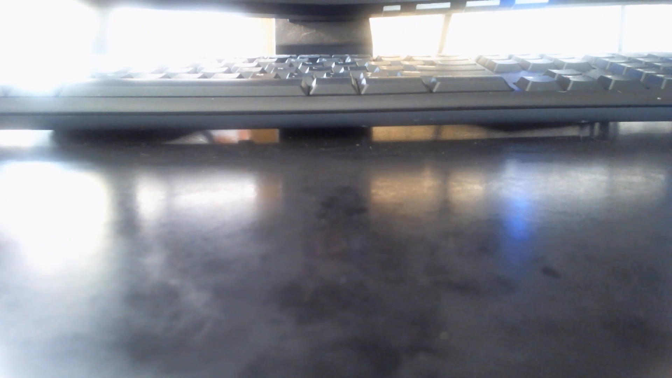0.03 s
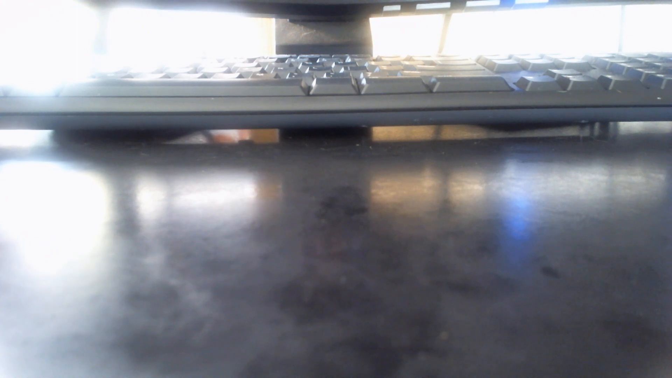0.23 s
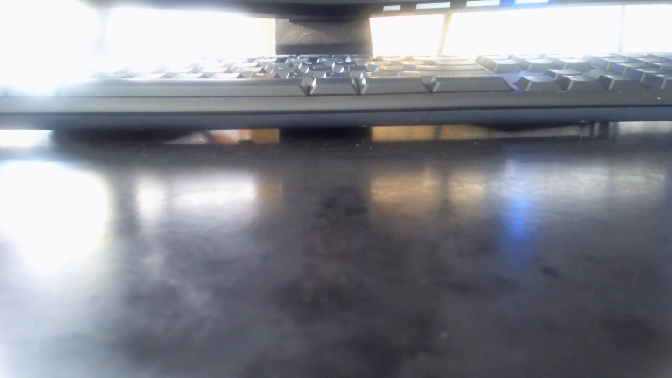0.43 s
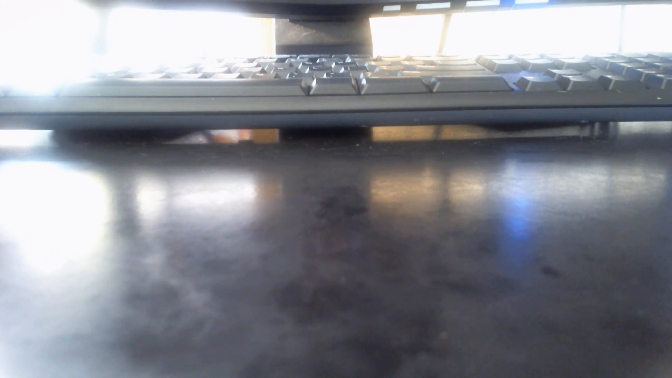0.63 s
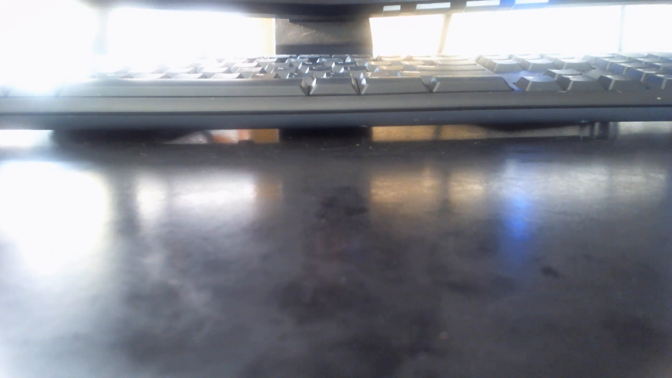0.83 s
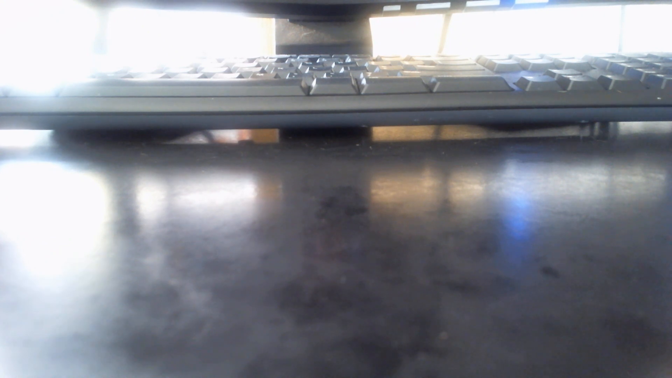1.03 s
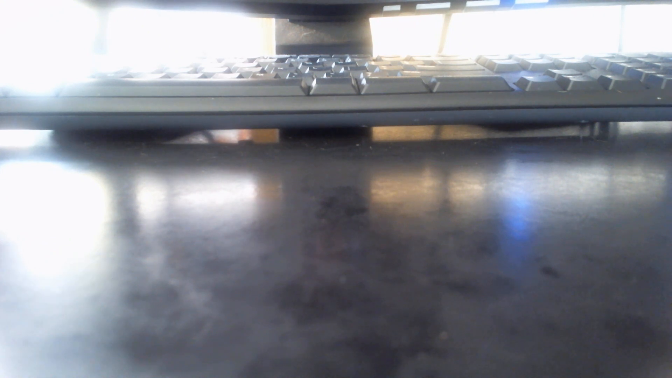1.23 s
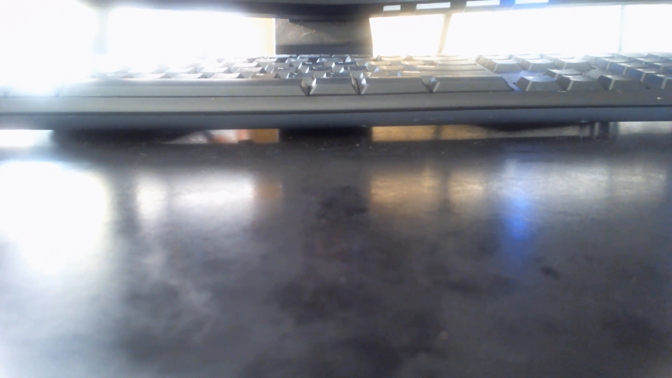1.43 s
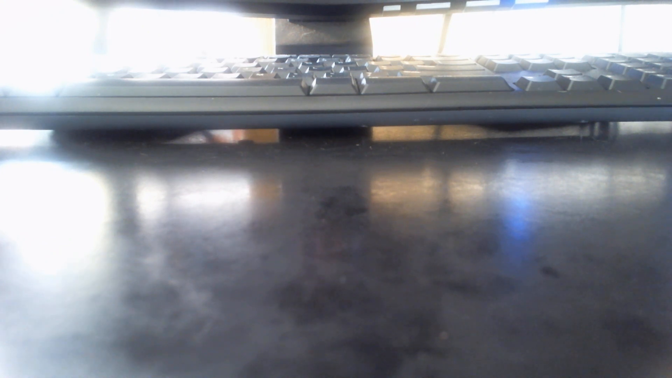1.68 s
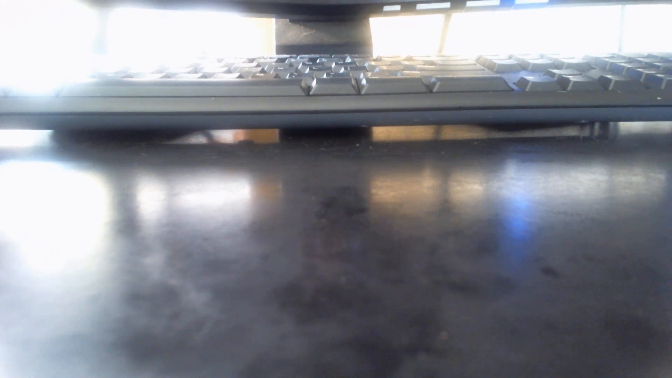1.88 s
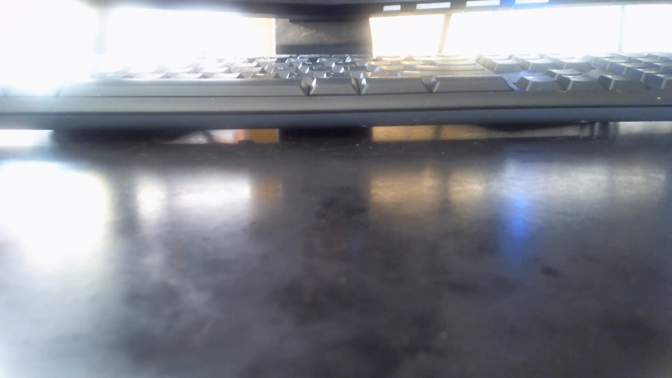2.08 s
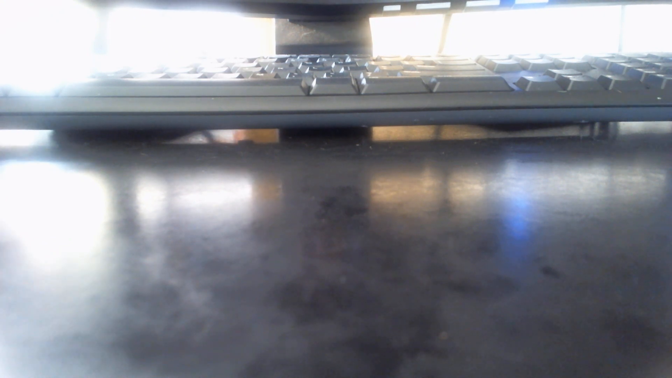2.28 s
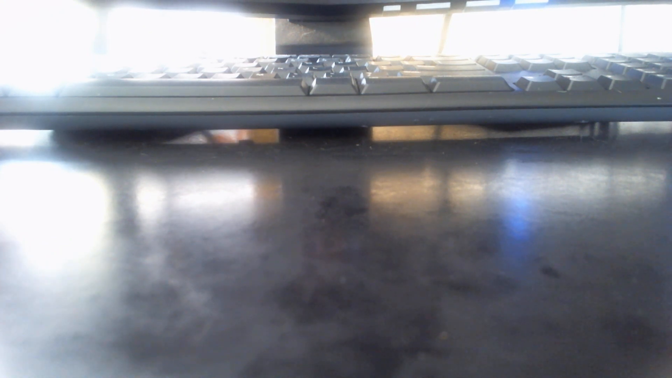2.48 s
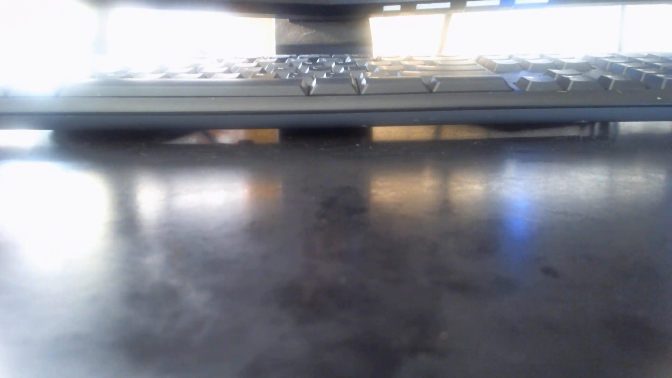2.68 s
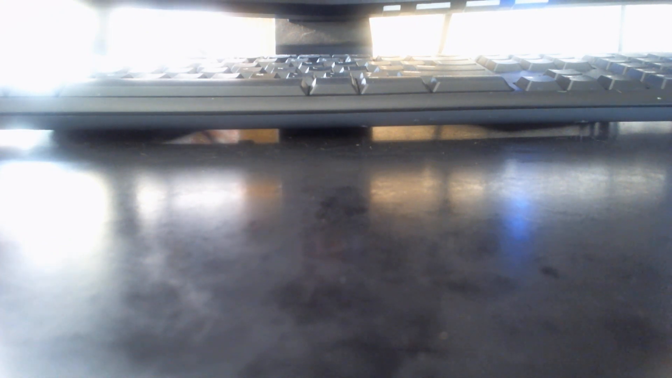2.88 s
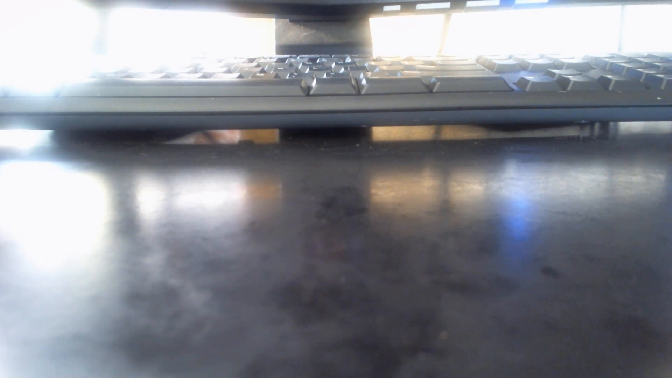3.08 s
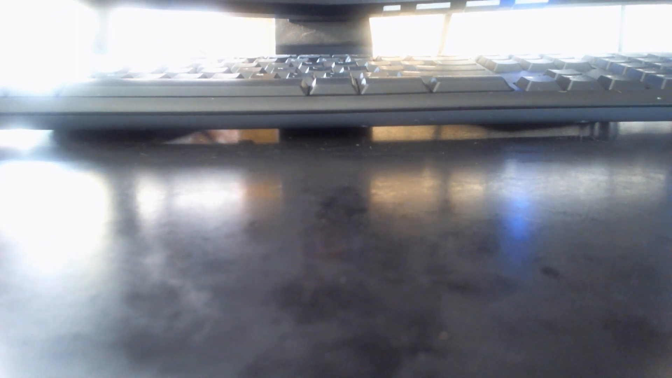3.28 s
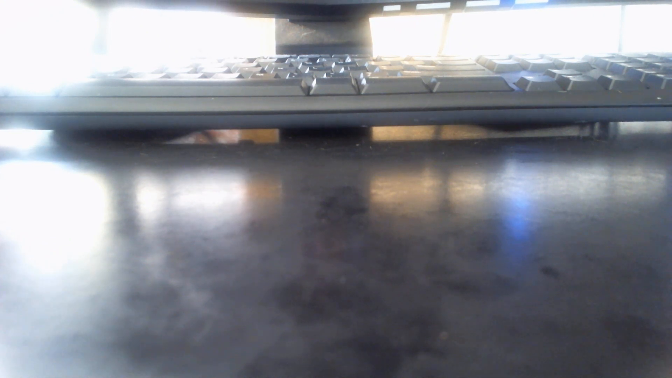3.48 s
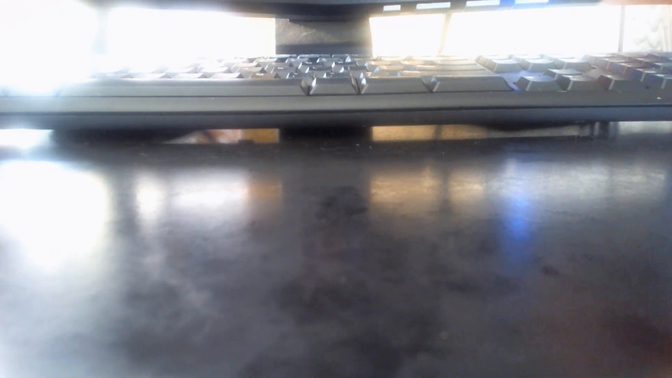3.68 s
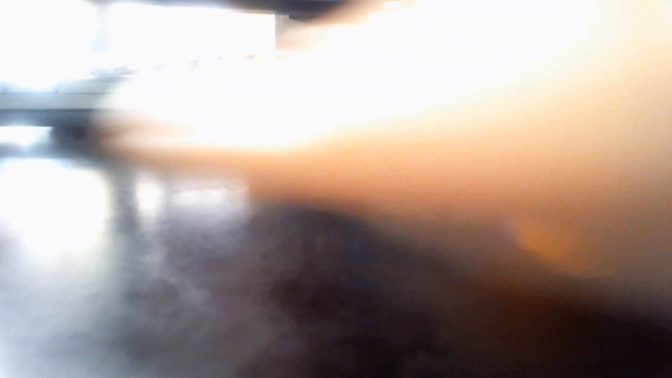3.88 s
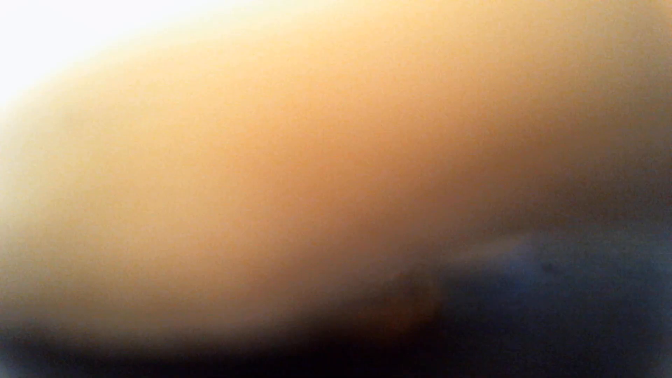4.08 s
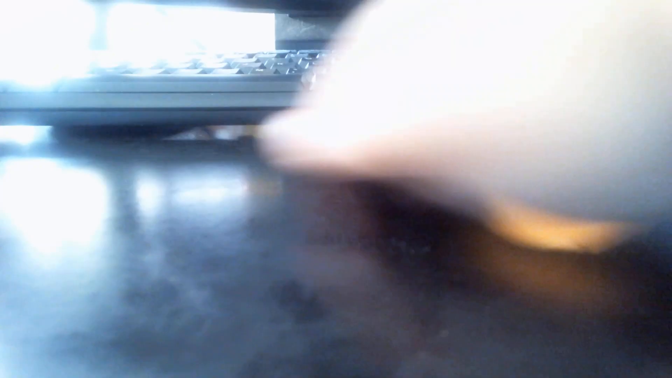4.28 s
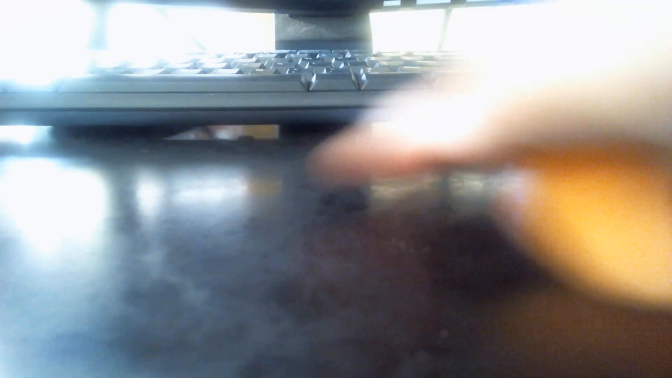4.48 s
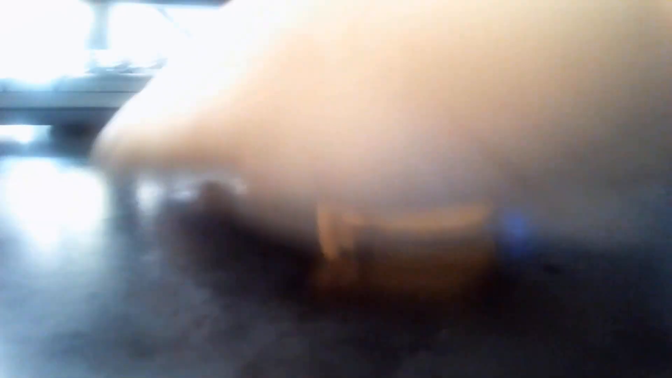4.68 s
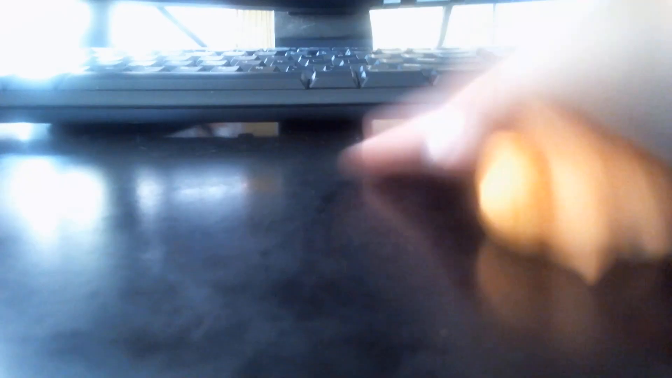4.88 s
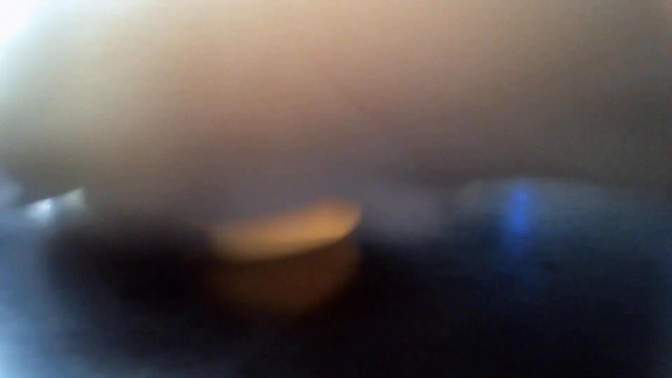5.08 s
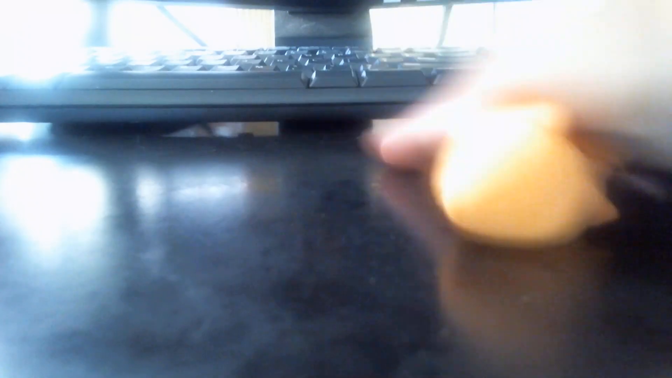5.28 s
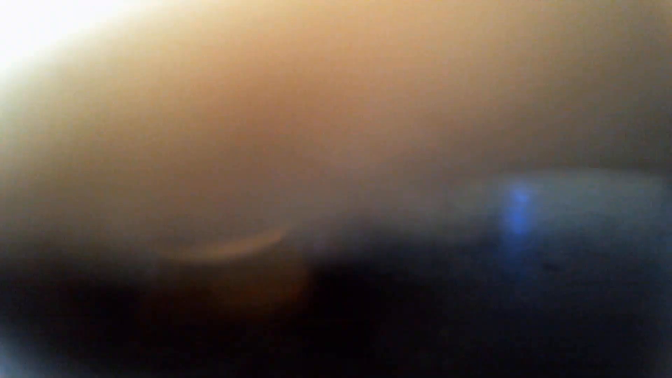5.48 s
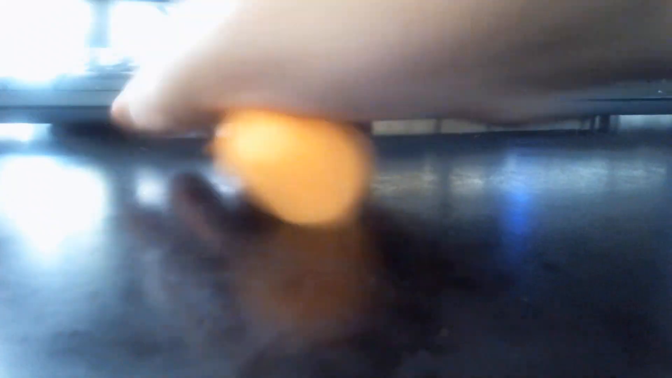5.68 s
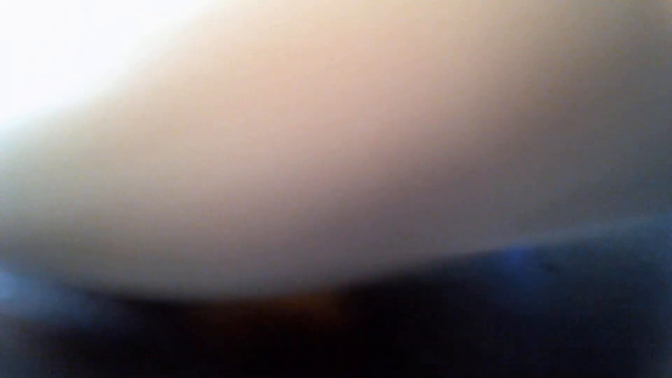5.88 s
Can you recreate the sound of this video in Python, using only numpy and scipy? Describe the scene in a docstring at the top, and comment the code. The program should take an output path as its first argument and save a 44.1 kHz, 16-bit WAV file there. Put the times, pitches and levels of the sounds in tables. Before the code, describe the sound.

Fingernails tick, tap and scuff on a hard desk as a hand slides close to the microphone, over a thin electrical whine and hiss.

```python
"""A hand scratching and tapping on a desk

A hand with a small object taps and slides over a hard desk, right by a camera lying on it.
Nails tick and scuff, skin hisses and sometimes judders, and the desk gives a few soft thumps.
Underneath are the camera's ticking focus, fluttering electrical buzz, thin whine and hiss."""
import sys
import numpy as np
from scipy import signal
from scipy.fft import rfft, irfft
from scipy.io import wavfile
from scipy.ndimage import uniform_filter1d

SR = 44100
rng = np.random.default_rng(int(sys.argv[2]) if len(sys.argv) > 2 else 0)


def to_wav(sig):
    """Store sig (one row per channel, or 1-D mono) as 16-bit WAV at the path in sys.argv[1].

    Samples outside -1..1 are clipped; the rate is SR.
    """
    pcm = np.clip(np.atleast_2d(sig), -1, 1) * 32767
    pcm = np.round(pcm).astype(np.int16)
    wavfile.write(sys.argv[1], SR, pcm.T)  # frames by channels


N = 261072
TIME = np.arange(N) / SR
# The brightest part of a touch on the desk. Each row: frequency in Hz, gain in dB.
BRIGHT_EDGE = [(5500, -16.5), (7600, 0.5), (9000, 0), (10500, -8.5), (12500, -19.5), (14000, -31),
               (16000, -36)]


def taps(level_db=18, chatter=0.24, thud_db=-17, thud_hz=650, thud_width_hz=600):
    """Each nail tick is one snap, a few milliseconds of chatter and a small thud in the desk top."""
    # Each row: start in seconds, relative level in dB, chatter fade in seconds, ring in Hz,
    # share of body in dB, share of bright edge in dB.
    ticks = [(1.0787, -33.5, 0.0016, 4400, -5, -26), (1.9162, -19, 0.00088, 3550, -3, -29),
             (1.9394, -21.5, 0.0014, 4160, -5, -26), (2.6313, -30, .004, 7100, -14, -14),
             (2.6699, -27, 0.0011, 4300, -24, -20), (2.8442, -21, 0.0021, 4700, -8.5, -15),
             (2.8952, -21, 0.0028, 6300, -12.5, -16.5), (2.9948, -26, 0.003, 5330, -1, -17),
             (3.1588, -28, 0.0014, 4370, -28, -16), (3.174, -33, 0.0013, 4130, -23, -27),
             (3.192, -27.5, .003, 5700, -13, -10), (3.656, -3, 0.00067, 5340, -10, -20),
             (3.6592, -18, 0.0016, 3100, 5, -14), (3.7175, -21, 0.0022, 5560, -7, -17),
             (3.8267, -29, .0008, 4500, -16, -24), (3.886, -24, 0.00073, 6000, -27, -3),
             (3.8928, -25, 0.0007, 4740, -14, -16), (4.372, -28.5, .001, 4720, -14, -9),
             (4.6057, -24.5, 0.002, 3270, -7, -28), (4.6287, -24, 0.0014, 5600, -9, -27),
             (4.6662, -26, 0.0013, 3370, -7, -21), (4.857, -31.5, 0.0013, 3670, 0, -6),
             (4.8714, -22.5, .0005, 5940, -6, 2), (4.9177, -18, 0.0013, 4840, -25, -9),
             (4.9563, -22.5, .0008, 5040, -2, -20), (5.0434, -24, 0.0035, 2300, -2, -12),
             (5.0497, -25, 0.00077, 2300, -3, -8), (5.068, -21.5, .0008, 6260, -33, -13),
             (5.0713, -21, 0.0032, 3480, -29, -11), (5.2906, -26.5, 0.0014, 2500, -10, -23),
             (5.3098, -29, .001, 4570, -9, -11), (5.346, -29.5, .0005, 5600, -34, -9),
             (5.4216, -18.5, 0.0023, 5440, -6, -13), (5.435, -13.5, 0.0011, 5860, -35, -18),
             (5.4586, -21.5, 0.002, 2450, 2, -26), (5.5418, -27.5, 0.004, 2980, -4, -17)]
    out, t = np.zeros(N), np.arange(SR // 100) / SR
    for start, db, chatter_s, ring_hz, body_db, edge_db in ticks + nail_catches():
        rattle = rng.standard_normal(len(t)) * np.exp(-t / chatter_s)
        blow = (t == 0) + chatter * rattle
        tick = signal.fftconvolve(blow, contact(ring_hz, body_db, edge_db, width_hz=1100, peak_db=9.5))
        thud = resonate(resonate(blow, thud_hz, thud_width_hz), thud_hz, thud_width_hz)
        add(out, start, amp(db + level_db) * tick / np.linalg.norm(tick))
        add(out, start, amp(db + level_db + thud_db + body_db / 2) * thud / np.linalg.norm(thud))
    return out


def nail_catches(per_s=6, over_skin_db=7, spread_db=1.8, chatter_s=0.0011, body_db=-9, edge_db=-14):
    """Nails catch at random as the hand slides, harder in a firm stroke. Gives more rows for taps()."""
    skin_db = 20 * np.log10(strokes()[0] + 1e-9)
    caught = np.flatnonzero(rng.random(N) < per_s / SR)
    db = skin_db + over_skin_db + spread_db * rng.standard_normal(N)
    ring_hz = rng.uniform(3000, 6000, N)
    return [(i / SR, db[i], chatter_s, ring_hz[i], body_db, edge_db) for i in caught]


def contact(ring_hz, body_db, edge_db, width_hz, peak_db):
    """How nail and desk answer one tiny slip: a low body, a high ring and a bright edge."""
    # The colours of body and ring. Each row: frequency in Hz, gain in dB.
    body_colour = [(60, 3), (300, -5), (700, -19), (1200, 5), (2100, 7), (2700, 5.5), (5000, -25.5)]
    ring_colour = [(1500, -77), (2500, -6.5), (4000, -3), (5900, -1.5), (6800, -6.5), (7800, -12.5),
                   (10000, -52)]
    hz = np.fft.rfftfreq(1024, 1 / SR)
    peak = 1 + amp(peak_db) / (1 + ((hz - ring_hz) / (width_hz / 2)) ** 2)
    ring = unit_level(gain_at(ring_colour, hz) * peak)
    body = amp(body_db) * unit_level(gain_at(body_colour, hz))
    edge = amp(edge_db) * unit_level(gain_at(BRIGHT_EDGE, hz))
    power = ring ** 2 + body ** 2 + edge ** 2
    # Turn this colour into a click that starts at once and then dies away.
    log_gain = np.log(np.r_[power, power[-2:0:-1]]) / 2
    click = np.fft.ifft(np.exp(np.conj(signal.hilbert(log_gain)))).real[:len(hz)]
    return click / np.linalg.norm(click)


def scuffs(level_db=-1.5, rise_share=0.48, fade=0.52, release_s=0.0063):
    """Each short scrape is a dense burst of slips that swells quickly and eases off."""
    # Each row: start in seconds, length in seconds, relative level in dB, ring in Hz,
    # share of body in dB, share of bright edge in dB.
    scrapes = [(1.252, .005, -41, 5100, -9, -24), (1.288, 0.026, -49, 2400, 3, -20),
               (1.904, 0.0098, -24.5, 3470, -10.5, -19), (1.913, 0.034, -32, 3550, -8, -16),
               (2.677, 0.028, -34.5, 5900, -9, -15), (2.779, 0.0046, -34, 3660, -14, -20),
               (2.992, .006, -39, 5270, -14, -13), (2.892, .01, -37, 5690, 1, -9),
               (3.109, 0.019, -37.5, 4600, -6.5, -22), (3.594, .04, -40, 3630, -6, -3),
               (3.654, 0.036, -28, 5050, -8, -33), (3.683, 0.033, -33.5, 3370, -15, -29),
               (3.792, 0.0058, -28, 5900, -24, -24), (3.805, 0.006, -24.5, 5860, -18, -12),
               (3.858, 0.022, -28, 6000, -27, -15), (3.905, 0.0092, -30, 5170, -28, -14),
               (3.982, 0.015, -34, 3160, -13, -18), (4.25, 0.024, -38, 3700, -6, -14),
               (4.343, 0.072, -43.5, 4870, -5, 1), (4.539, 0.0084, -33.5, 3300, -9, -17),
               (4.638, .025, -34, 3560, -6, -22), (4.683, 0.014, -32, 3070, -29, -8),
               (4.746, 0.0094, -34, 7080, -11, -6.5), (4.88, 0.073, -29, 5840, -15, -6),
               (4.98, 0.034, -40.5, 2730, 4, -21), (5.4312, 0.0042, -28.5, 5540, -0.5, 3),
               (5.73, 0.031, -36, 3000, -7, -12), (5.78, 0.02, -29, 5000, -12, -19)]
    out, t = np.zeros(N), np.arange(SR // 12) / SR
    slips = grit(per_s=3400, spread_db=3.0, smooth=0.51)
    for start, length, db, *colour in scrapes:
        rise = np.minimum(t / (rise_share * length), 1)
        fall = np.exp(-fade * t / length - np.maximum(t - length, 0) / release_s)
        friction = rise * fall * np.roll(slips, -round(start * SR))[:len(t)]
        scrape = signal.fftconvolve(friction, contact(*colour, width_hz=580, peak_db=10))
        add(out, start, amp(db + level_db) * np.sqrt(length * SR) * scrape / np.linalg.norm(scrape))
    return out


def slide(skin_db=-0.5, palm_db=1, fizz_db=-3.5, uneven_db=1.46, echo=0.56, echo_s=0.000418, sway=0.25):
    """Skin drags over the desk's fine grain under an unsteady pressure."""
    # The colours of skin hiss and palm rustle. Each row: frequency in Hz, gain in dB.
    skin_colour = [(1000, -41), (1600, -1.5), (1950, 4.5), (2300, -2), (2750, 0.5), (3400, 4.5), (4600, 7),
                   (5800, 4), (6600, -1.5), (7400, -7), (9000, -28)]
    palm_colour = [(40, 11.5), (120, -3.5), (280, -3), (600, 0), (1200, 3), (1600, -2), (2600, -71)]
    skin, palm, fizz = strokes()
    pressure = amp(uneven_db * coloured_noise([(5, -5), (25, 7), (70, -24), (200, -36), (600, -67)]))
    slips = pressure * grit(per_s=2200, spread_db=5.5, smooth=1.18)
    # The cupped palm reflects the sound; its changing height shifts the hollow colour.
    wander = coloured_noise([(1, 0), (5, 0), (10, -30), (30, -120)])
    delay_s = echo_s * np.exp(sway * wander)
    slips = slips + echo * np.interp(TIME - delay_s, TIME, slips)
    return (amp(skin_db) * skin * coloured(slips, skin_colour)
            + amp(palm_db) * palm * coloured(slips, palm_colour)
            + amp(fizz_db) * fizz * coloured(slips, BRIGHT_EDGE))


def strokes(attack_s=0.037, release_s=0.066, sag_db_per_s=6):
    """Strength of skin, palm and fizz: a stroke sets in fast, slackens and dies as the hand slows."""
    # Each row: start and length in seconds, then relative levels of skin, palm and fine fizz in dB.
    hand_moves = [(1.867, 0.034, -37.5, -50, -57), (2.073, .22, -54, -58.5, -64),
                  (2.64, 0.31, -50.5, -50, -62), (3.102, 0.23, -61, -55.5, -72),
                  (3.463, 0.044, -50, -77, -64), (3.575, 0.18, -40, -42.5, -46),
                  (3.802, 0.31, -43.5, -46.5, -54), (4.017, 0.28, -39.5, -43.5, -56),
                  (4.297, 0.22, -42.5, -46.5, -53), (4.575, 0.14, -41, -50, -56),
                  (4.81, 0.072, -44, -45.5, -46), (4.892, 0.17, -36, -47, -46.5),
                  (5.09, 0.21, -46, -64, -57), (5.256, .08, -43, -73, -43.5), (5.429, 0.11, -41, -51, -48),
                  (5.711, 0.044, -37.5, -54, -46), (5.882, .035, -34.5, -68, -47)]
    power = np.zeros((3, N))
    for start, length, *levels in hand_moves:
        t = np.maximum(TIME - start, 0)
        press = np.minimum(t / attack_s, 1) * amp(-sag_db_per_s * t)
        release = np.exp(-np.maximum(t - length, 0) / release_s)
        power += np.outer(amp(levels), press * release) ** 2
    return np.sqrt(power)


def grit(per_s, spread_db, smooth):
    """Tiny slips of very unequal force over a smooth hiss."""
    force = amp(spread_db * np.minimum(rng.exponential(1, N), 4)) * rng.choice([-1, 1], N)
    slips = unit_level(force * (rng.random(N) < per_s / SR))
    return unit_level(slips + smooth * rng.standard_normal(N))


def squeak(rough=0.11):
    """A nail slips so fast that it sings, rising in pitch."""
    # Each row: time in seconds, level in dB, pitch in Hz.
    glide = [(4.9, -37, 6620), (4.902, -17, 6660), (4.9033, -19, 7140), (4.9045, -13.5, 6900),
             (4.9074, -14.5, 7260), (4.91, -32, 7900), (4.911, -42, 7700)]
    times, db, hz = np.transpose(glide)
    tone = np.sqrt(2) * np.sin(2 * np.pi * np.cumsum(np.interp(TIME, times, hz)) / SR)
    grain = unit_level(resonate(rng.standard_normal(N), hz=6500, width_hz=2200))
    return amp(np.interp(TIME, times, db, left=-140, right=-140)) * (tone + rough * grain)


def judders(overtone_db=-10, jitter=0.21):
    """A fingertip sticks and lets go in a short, uneven train of rounded pushes."""
    # Each row: start and length in seconds, level in dB, first and last slip rate in Hz,
    # roughness from 0 to 1.
    trains = [(2.86, 0.044, -32, 282, 285, 0), (2.878, 0.075, -40, 291, 283, 0.13),
              (4.58, .03, -36.5, 219, 208, 0.3), (4.6, 0.044, -28, 211, 140.6, 0.05)]
    out = np.zeros(N)
    for start, length, db, first_hz, last_hz, rough in trains:
        size = round(length * SR)
        wobble, rub = (unit_level(resonate(rng.standard_normal(SR // 4), hz, hz)[-size:])
                       for hz in (100, 480))
        turns = np.cumsum(np.linspace(first_hz, last_hz, size) * (1 + jitter * wobble)) / SR
        pushes = sum(amp(overtone_db * k) * np.cos(2 * np.pi * (k + 1) * turns) for k in range(4))
        judder = (unit_level(pushes) + rough * rub) * signal.windows.tukey(size, .35)
        add(out, start, amp(db) * unit_level(judder))
    return out


def rubs():
    """Dull rubs and soft thumps: each gentle touch stirs one broad resonance."""
    # Each row: start and length in seconds, level in dB, centre and width in Hz.
    touches = [(.648, .03, -40, 53, 37), (1.075, 0.02, -47.5, 696, 500), (1.337, 0.13, -57.5, 1080, 140),
               (1.905, 0.05, -44, 456, 600), (2.841, 0.0088, -38.5, 900, 700),
               (2.853, 0.034, -40.5, 510, 420), (2.992, 0.0088, -42.5, 1010, 700),
               (3.036, 0.04, -30.5, 70.5, 64), (3.08, 0.032, -38, 99, 53.6),
               (3.132, 0.082, -34, 35.4, 37.2), (3.223, 0.026, -30.5, 37.6, 48),
               (3.245, 0.073, -52.5, 1050, 190), (3.348, 0.15, -39.5, 26, 27),
               (3.533, 0.031, -42.5, 540, 500), (3.657, 0.059, -35, 1440, 470),
               (3.664, 0.059, -38, 920, 280), (4.186, 0.019, -37, 80, 46), (4.476, 0.023, -44, 920, 378),
               (4.477, 0.039, -41.5, 366, 220), (4.747, 0.025, -40, 330, 190),
               (4.895, .065, -38, 1910, 700), (5.647, .025, -49, 740, 500)]
    out = np.zeros(N)
    for start, length, db, hz, width in touches:
        size = round(length * SR)
        stir = resonate(resonate(rng.standard_normal(SR // 3), hz, width), hz, width)[-size:]
        add(out, start, amp(db) * unit_level(stir * signal.windows.tukey(size, .7)))
    return out


def arm():
    """The forearm drags, and a dull rumble reaches the camera through the desk."""
    # Each row: time in seconds, level in dB.
    drag_levels = [(2.3, -52), (2.6, -46), (3.5, -43), (4.2, -41), (5, -41), (5.9, -38.5)]
    # Each row: frequency in Hz, gain in dB.
    drag_colour = [(12, 8.5), (30, -3), (60, -1), (150, -12), (420, -17.5), (650, -34), (1100, -65)]
    return amp(np.interp(TIME, *np.transpose(drag_levels), left=-100)) * coloured_noise(drag_colour)


def room(x, echo_db=-19, fade_s=0.51):
    """A small room answers with faint, scattered echoes."""
    t = np.arange(SR // 3) / SR
    echoes = rng.standard_normal(len(t)) * (rng.random(len(t)) < .1)
    tail = echoes * amp(-60 * t / fade_s) * (t > .003)
    return x + amp(echo_db) * signal.fftconvolve(x, tail / np.linalg.norm(tail))[:N]


def focus(peak_db=-31, uneven_db=1.0, rebound_s=0.012, rebound_db=-4, kick_s=0.00076):
    """The lens hunts for focus: each step kicks its mount, then again more softly as it stops."""
    # Each row: first and last step in seconds, number of steps.
    step_runs = [(4.057, 4.4035, 8), (4.5485, 5.334, 20), (5.5405, 5.6645, 4), (5.83, 5.9125, 3)]
    # Each row: pitch in Hz, relative level in dB, seconds to fade by 60 dB.
    mount_tones = [(1640, 3.5, 0.038), (2090, -1, .012), (2850, 9.5, 0.018), (3560, 10, 0.01),
                   (4300, -6, 0.0093)]
    out, t = np.zeros(N), np.arange(SR // 30) / SR
    ring = sum(amp(db - 60 * t / fade_s) * np.sin(2 * np.pi * hz * t) for hz, db, fade_s in mount_tones)
    for start in np.concatenate([np.linspace(*run) for run in step_runs]):
        db = peak_db + uneven_db * rng.standard_normal()
        for delay, softer in ((0, 0), (rebound_s, rebound_db)):
            kick = (t == 0) + 0.21 * rng.standard_normal(len(t)) * np.exp(-t / kick_s)
            tick = signal.fftconvolve(kick, ring)
            add(out, start + delay, amp(db + softer) * tick / abs(tick).max())
    return out


def buzz(pictures_per_s=17.21, on_db=-40, off_db=-35, settle_s=0.0087, sizzle_db=-67, blip_db=-67):
    """A fluttering electrical buzz (a bump, tones, a dip, a high blip), with faint lens ticks."""
    # Tones heard only while a picture is read. Each row: pitch in Hz, level in dB.
    reading_tones = [(3815, -66), (4190, -61.5), (8003, -68.5), (8120, -91), (8375, -69)]
    # The lens ticks come and go. Each row: time in seconds, level in dB.
    tick_levels = [(0, -70), (1.05, -70), (1.2, -61.5), (2, -66.5), (3.1, -64)]
    since_on, since_off, since_tick, since_blip = (
        (TIME - start) % (1 / pictures_per_s) for start in (.0537, .0278, .0002, .0322))
    bumps = amp(on_db) * np.exp(-since_on / (2 * settle_s)) - amp(off_db) * np.exp(-since_off / settle_s)
    bumps = signal.lfilter(*signal.butter(2, 380, fs=SR), bumps - bumps.mean())
    reading = uniform_filter1d(1. * (since_on < since_off), size=60)
    tones = reading * sum(amp(db) * np.sqrt(2) * np.sin(2 * np.pi * hz * TIME)
                          for hz, db in reading_tones)
    noise = rng.standard_normal(N)
    sizzle = amp(sizzle_db) * reading * (band(noise, 8100, 900) + 0.98 * band(noise, 3800, 1200))
    burst = noise * np.exp(-since_tick / 0.003)
    tick_gain = amp(np.interp(TIME, *np.transpose(tick_levels)))
    lens_ticks = tick_gain * (band(burst, 1635, 250) + 0.85 * band(burst, 2750, 490))
    high_blips = amp(blip_db) * band(noise * np.exp(-since_blip / 0.0053), 4700, 2900)
    return bumps + tones + sizzle + lens_ticks + high_blips


def whine(pulse_hz=96.9, high_db=-52.5, high_hz=5735, low_db=-66, low_hz=4610, width_hz=130):
    """Uneven switching pulses ring two narrow, high resonances, beside a hum and thin tones."""
    # Steady electrical tones. Each row: pitch in Hz, level in dB.
    steady_tones = [(120, -54), (240, -64), (1502, -67.5), (1550, -71.5), (5749, -71)]
    pulses = np.diff(np.floor(TIME * pulse_hz), prepend=0)
    drive = unit_level(pulses * (1 + rng.standard_normal(N))) + 0.75 * rng.standard_normal(N)
    high = amp(high_db) * band(resonate(drive, high_hz, width_hz), high_hz, width_hz=1500)
    low = amp(low_db) * band(drive, low_hz, width_hz)
    tones = sum(amp(db) * np.sqrt(2) * np.sin(2 * np.pi * (hz * TIME + rng.random()))
                for hz, db in steady_tones)
    return high + low + tones


def hiss_and_rumble(hiss_db=-51.5, rumble_db=-48):
    """The microphone hisses and the room rumbles low."""
    # The colour of each noise. Each row: frequency in Hz, gain in dB.
    hiss_colour = [(180, -42), (300, 0), (565, -4), (749, -4.5), (1410, -11.5), (1530, -10.5),
                   (2210, -13.5), (3350, -14), (4090, -16), (4990, -13.5), (5800, -2.5), (6850, -23.5),
                   (8220, -17.5), (9090, -30), (16000, -43)]
    rumble_colour = [(10, -2), (35, 8.5), (70, -0.5), (150, -5), (300, -10), (450, -38.5)]
    return amp(hiss_db) * coloured_noise(hiss_colour) + amp(rumble_db) * coloured_noise(rumble_colour)


def amp(db):
    """Turns decibels into a gain."""
    return 10 ** (np.asarray(db) / 20)


def unit_level(x):
    """Scales a sound to an average power of 1."""
    return x / np.sqrt(np.mean(abs(x) ** 2) + 1e-20)


def gain_at(colour, hz):
    """Reads gains off a colour: a curve through points of frequency in Hz and gain in dB."""
    points_hz, db = np.transpose(colour)
    return amp(np.interp(np.log(hz + 1), np.log(points_hz + 1), db))


def coloured(x, colour):
    """Filters a sound by a colour, at power 1."""
    return unit_level(irfft(rfft(x) * gain_at(colour, np.fft.rfftfreq(len(x), 1 / SR)), len(x)))


def coloured_noise(colour):
    """Noise of the given colour, at power 1."""
    return coloured(rng.standard_normal(N), colour)


def band(x, hz, width_hz):
    """Keeps one smooth band of frequencies, at power 1."""
    freqs = np.fft.rfftfreq(len(x), 1 / SR)
    return unit_level(irfft(rfft(x) / (1 + (2 * (freqs - hz) / width_hz) ** 4), len(x)))


def resonate(x, hz, width_hz):
    """Makes a sound ring at one pitch; a narrower width rings longer."""
    pole = np.exp((2j * np.pi * hz - np.pi * width_hz) / SR)
    return signal.lfilter([1 - abs(pole)], [1, -pole], x).real


def add(mix, start_s, sound):
    """Mixes a sound in at its start time."""
    part = mix[max(round(start_s * SR), 0):][:len(sound)]
    part += sound[:len(part)]


def scene():
    """The hand's sounds in the room, over the camera's own noises, in one channel."""
    background = hiss_and_rumble() + buzz() + whine() + focus()
    hand = slide() + arm() + taps() + scuffs() + squeak() + judders() + rubs()
    return (background + room(hand))[None]


def record(dry, cutoff_hz=16100):
    """The input overloads softly on the hardest tap, and the highest treble is cut off."""
    softened = 0.86 * np.tanh(dry / 0.93)
    low_pass = signal.firwin(511, cutoff_hz, window=("kaiser", 9), fs=SR)
    return signal.oaconvolve(softened, low_pass[None], "same")


dry = scene()
out = record(dry)
to_wav(out)
```